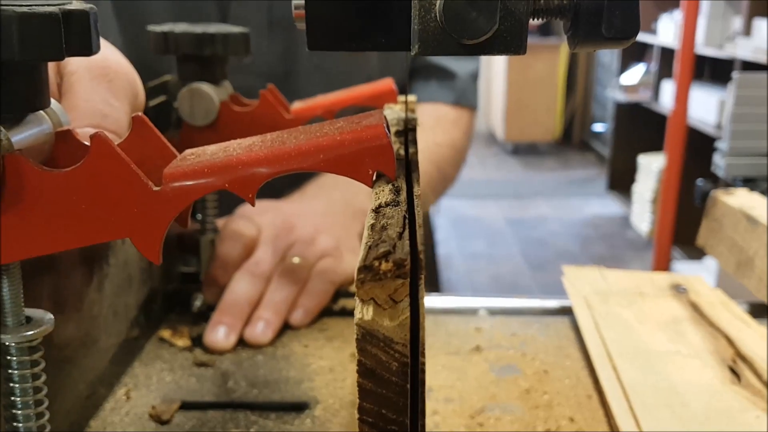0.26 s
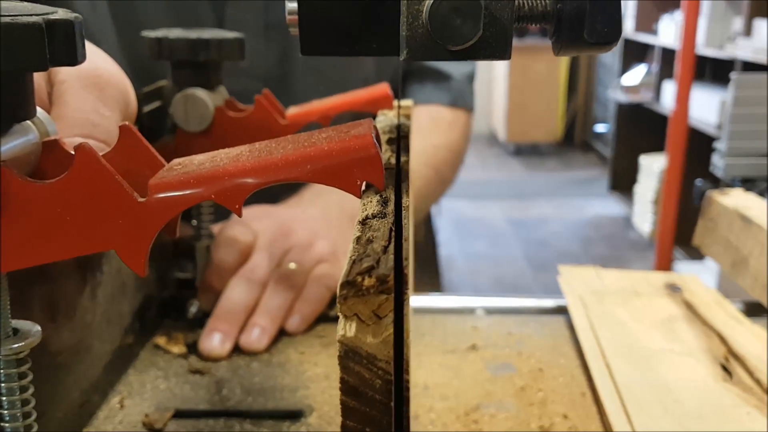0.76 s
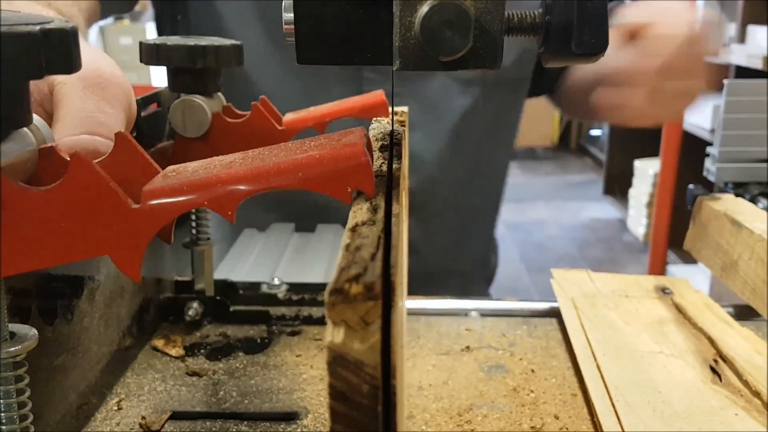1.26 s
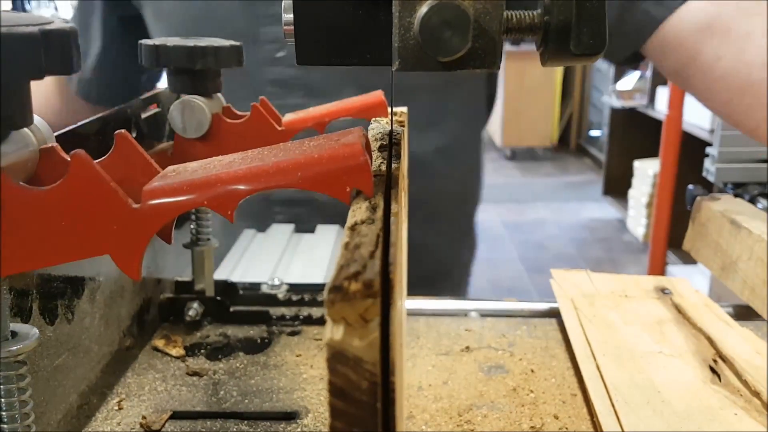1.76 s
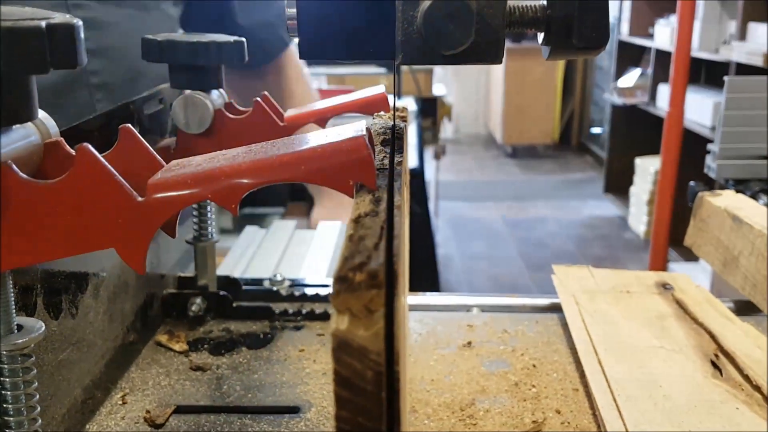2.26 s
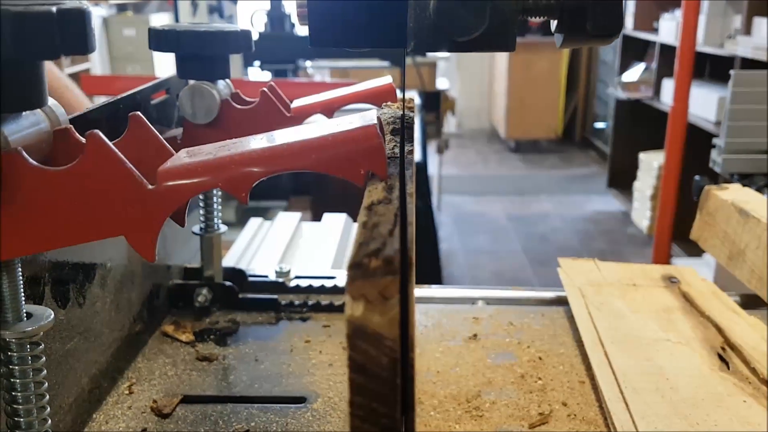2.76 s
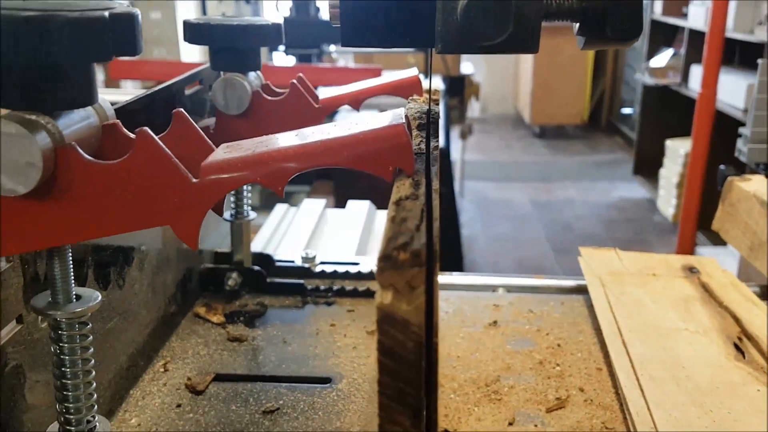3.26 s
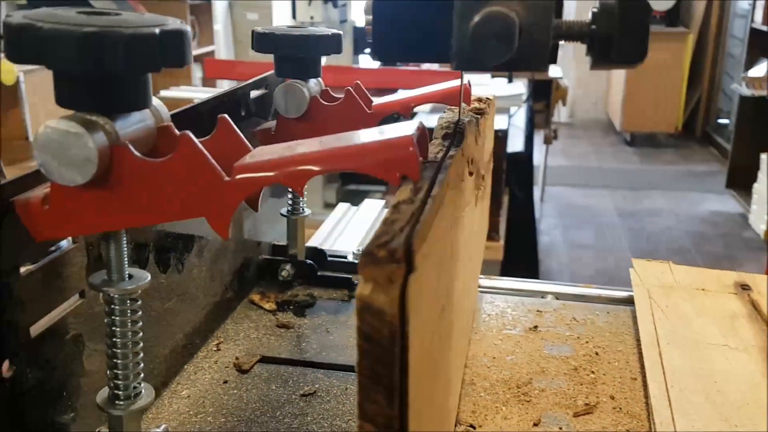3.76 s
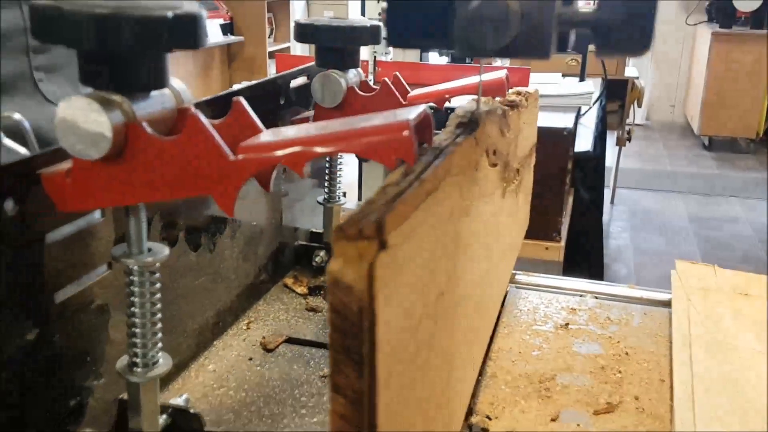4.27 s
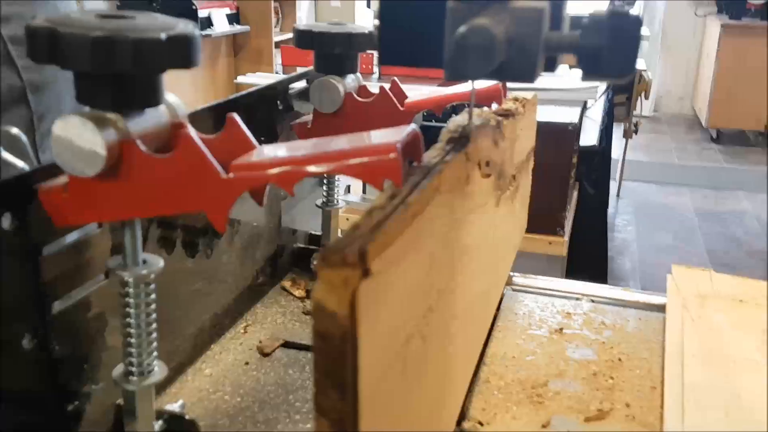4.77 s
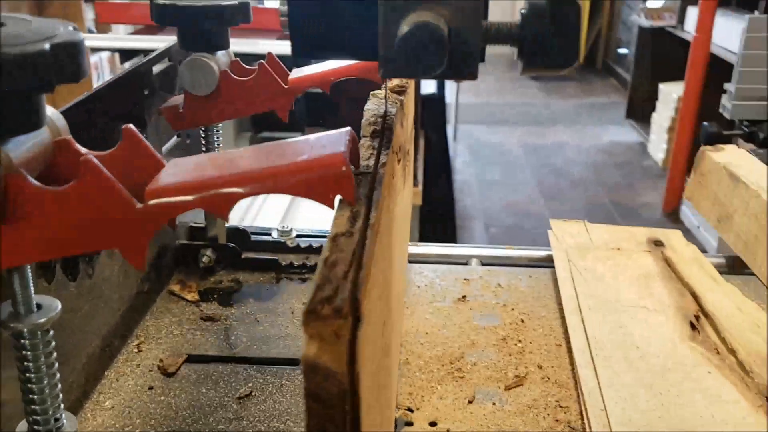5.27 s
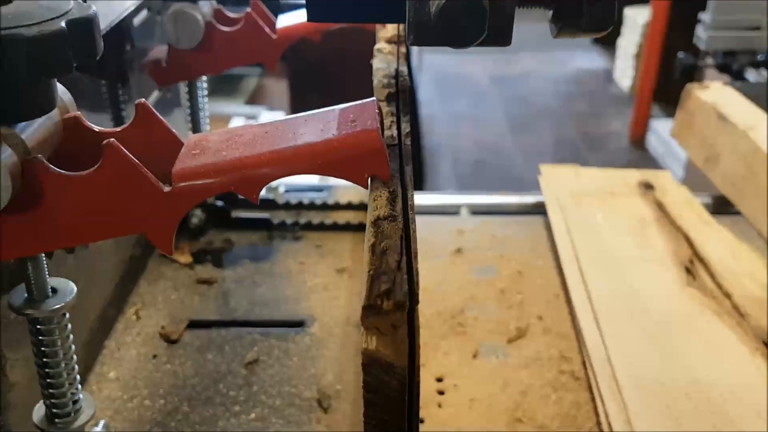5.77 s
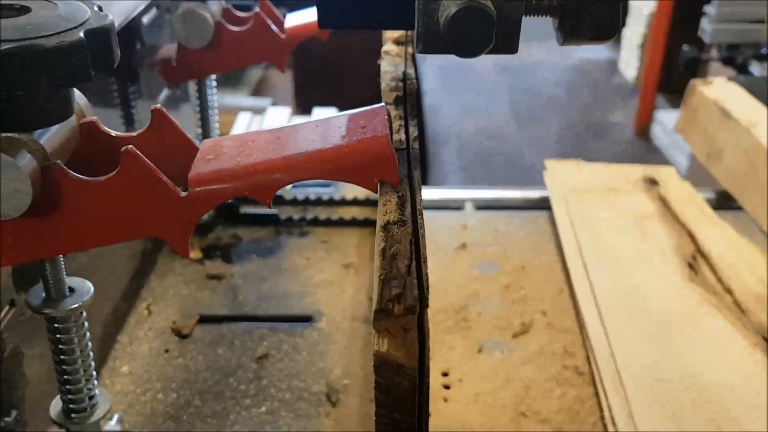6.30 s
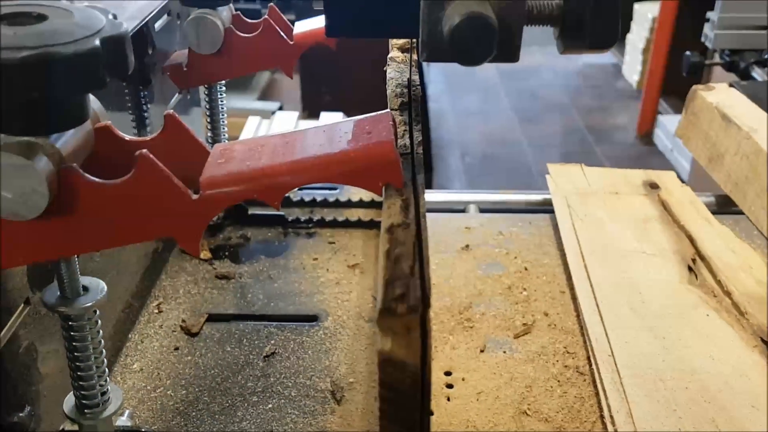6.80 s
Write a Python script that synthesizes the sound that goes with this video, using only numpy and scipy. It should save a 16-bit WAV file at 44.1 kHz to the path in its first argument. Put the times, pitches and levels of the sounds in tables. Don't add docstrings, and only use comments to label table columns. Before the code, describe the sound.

Stuttering wood squeal and chip hiss stop as a bandsaw blade comes free, rings harshly, and slows in a long falling metallic whir.

```python
import sys
import numpy as np
from scipy import signal
from scipy.fft import rfft, irfft, next_fast_len
from scipy.io import wavfile
from scipy.ndimage import uniform_filter1d

SR = 44100
rng = np.random.default_rng(int(sys.argv[2]) if len(sys.argv) > 2 else 0)


def transcribe(u):
    v = np.clip(np.atleast_2d(u).T, -1, 1)
    q = np.round(v * 32767).astype(np.int16)
    wavfile.write(sys.argv[1], SR, q)


def how_loud(loudness_db):
    steps = np.asarray(loudness_db, float) / 20
    return 10 ** steps


N = 310444

TEETH_PER_LAP, TEETH_PER_MOTOR_TURN = 166.38, 67.5
LEAVES_WOOD_S, EXTRACTOR_OFF_S = 1.194, 2.59

# time_s, level_db
RUN_LEVEL = [(0, -33.5), (.6, -36), (.95, -31.5), (1.15, -33.5), (1.27, -31), (1.5, -31), (1.9, -33.5),
             (2.8, -34), (3.0, -33.5), (3.15, -33), (3.28, -32.5), (3.4, -34), (3.68, -34), (3.78, -34.5),
             (4.7, -35.5), (5.05, -37), (5.9, -36.5), (7.04, -39.5)]
# pitch_hz, width_hz, level_db
FRAME_MODES = [(1123.6, 22, -5), (1393, 29, 2), (1743, 295, -8.5), (2320, 58, 2), (2520, 86, -13),
               (2900, 78, 5), (3058, 190, 1), (3900, 76, 1.5), (4387, 240, -0.5), (4584, 36, 6),
               (4850, 330, -7), (5654, 36, 3), (5990, 720, -10)]
# pitch_hz, width_hz, level_db
GUIDE_MODES = [(6960, 210, -16), (8900, 160, 18.5), (8800, 630, -7)]
# pitch_hz, level_db (per Hz)
BETWEEN_MODES = [(350, -36.5), (600, -20), (1100, -12.5), (2100, -10), (2900, -5), (3550, -5.5),
                 (4400, -4.5), (5300, -5.5), (6500, -4), (10300, -5), (11500, -0.5), (12200, -7),
                 (13200, 0.5), (14700, -8)]
# start_s, length_s, top_db
GUIDE_BRUSHES = [
    (2.488, 0.055, 4),
    (2.85, 0.092, 3),
    (3.293, 0.4, 3),
    (4.77, 0.034, 1.5),
    (4.967, 0.028, 3.5),
    (6.08, 0.054, 2.5),
    (6.26, 0.033, 1.5),
    (6.495, 0.075, 1.5),
]


def saw(per_s, passed):
    brush_db = sum(db * swell(s, length, edge_s=0.025) for s, length, db in GUIDE_BRUSHES)
    body_share = 0.47
    frame_db = in_time(RUN_LEVEL)[0] + body_share * brush_db
    bright_db = -8 + 1.5 * in_wood() - 0.45 * halvings(per_s) + (1 - body_share) * brush_db
    drive = friction(passed) + teeth(per_s)

    wide = how_loud(-0.5) * colour(drive, BETWEEN_MODES)
    dull = signal.sosfiltfilt(signal.butter(2, 7200, fs=SR, output="sos"), wide)
    board_damping = how_loud(-7.0 * in_wood())
    low = board_damping * body(drive, FRAME_MODES, flicker_db=1.0, rate=23.0) + dull

    guides_db = -10.0 - 7.0 * in_wood() - 4.5 * swell(3.72, 7, edge_s=.1)
    high = how_loud(guides_db) * body(drive, GUIDE_MODES, flicker_db=2.7, rate=1.6) + wide - dull
    return how_loud(frame_db) * (rms_one(low) + how_loud(bright_db) * rms_one(high))


def friction(passed):
    lap = (passed / TEETH_PER_LAP + .2335) % 1
    weld = how_loud(8.0 + 1.5 * drift(0.5)) * np.exp(-lap / 0.055)
    throb_db = np.sin(2 * np.pi * passed / TEETH_PER_MOTOR_TURN)
    grit = how_loud(2.31 * rng.exponential(1, N)) * rng.standard_normal(N)
    return rms_one(grit) * np.sqrt(1 + 0.7 * weld) * how_loud(throb_db + 0.47 * drift(31))


# multiple, level_db
FAINT_MULTIPLES = [(4, -24), (5, -25), (8, -22), (10, -25), (14, -25), (15, -19), (16, -21), (28, -20)]


def teeth(per_s):
    order, db = np.transpose(FAINT_MULTIPLES)
    out = 0
    for k in (4, 5, *range(8, 29)):
        line = whine(k * per_s, np.interp(k, order, db), flutter_db=3.0, rate=7.0)
        out += line * (k * per_s < 16500)
    return out


# pitch_hz, width_hz, level_db
SWEPT_MODES = [(785, 44, -3), (1140, 270, -5), (1453, 215, -0.5), (1613, 82, 3), (1920, 310, -1.5),
               (2220, 430, 1), (3100, 690, 10.5), (3360, 140, 7), (4060, 160, -9), (4340, 600, 13.5),
               (4910, 115, 13), (5850, 760, 5), (7400, 2000, -8), (10800, 8500, 1)]
# multiple, level_db
STRONG_MULTIPLES = [(1, -40), (2, -50), (3, -58), (6, -54), (7, -58)]
# start_s, length_s, multiple, level_db
SINGING_MULTIPLES = [(-.05, 0.24, 6, -36.5), (0.51, .33, 6, -44), (.75, .48, 7, -56), (.98, .24, 6, -56),
                     (1.07, 0.11, 1, -47), (1.474, 0.26, 3, -40), (1.5, 0.27, 2, -49),
                     (1.802, 0.36, 7, -54), (2.3, 0.51, 7, -66), (1.8, 0.83, 6, -64), (2.5, .4, 8, -56),
                     (1.803, 0.26, 1, -44), (2.133, 0.25, 1, -43.5), (2.47, 0.4, 3, -49),
                     (2.844, 0.1, 2, -37.5), (3.032, 0.2, 2, -40.5), (2.872, 0.49, 3, -41.5),
                     (4.098, 0.57, 2, -52.5), (3.6, 2, 7, -58), (5.62, 0.17, 7, -53), (5.3, 0.51, 2, -50.5),
                     (5.652, 0.18, 3, -51.5), (6.07, 0.13, 4, -43.5), (6.09, .09, 3, -51),
                     (6.59, 0.11, 7, -47), (6.875, 0.095, 7, -45.5)]


def whistle(per_s):
    per_s = per_s + 2.5 * drift(9.1)
    near_db = 0.51 * (in_time(RUN_LEVEL)[0] + 34)
    slowing_db = 3.5 * halvings(per_s)
    taut_db = 7.5 * swell(-1.06, 2.72, edge_s=0.072)
    flutter_db = 1.4 + .8 * halvings(per_s)
    out = 0
    for multiple, line_db in STRONG_MULTIPLES:
        hz = round(multiple) * per_s
        power = how_loud(2 * -18.5)
        for mode_hz, width, mode_db in SWEPT_MODES:
            power = power + how_loud(2 * mode_db) / (1 + (2 * (hz - mode_hz) / width) ** 2) ** 2
        db = line_db + 10 * np.log10(power) - slowing_db + near_db - 4.3 * in_wood() - taut_db
        out += whine(hz, db, flutter_db, rate=13.0) * (1 + 0.5 * drift(74))
    for s, length, multiple, db in SINGING_MULTIPLES:
        line = whine(round(multiple) * per_s, db, flutter_db=1.0, rate=42.0)
        out += swell(s, length, edge_s=0.029) * line * (1 + 0.57 * drift(84))
    return out


# pitch_hz, width_hz, level_db
BOARD_MODES = [(1539, 36, -11.5), (1600, 30, -3), (1659, 20.5, -2), (1737, 35, -2.5), (1850, 55, -9.5)]
# pitch_hz, width_hz, level_db
SQUEAL_OVERTONES = [(3110, 61, 4.5), (3247, 59, -1), (3377, 26, -2), (4900, 150, 2)]
# pitch_hz, width_hz, level_db
KERF_MODES = [(152, 65, -20), (2420, 630, 2), (3610, 150, 11), (4440, 120, -18), (5630, 310, 13),
              (6670, 120, 1), (7200, 340, 8.5), (8160, 380, 7), (9740, 490, 7), (12140, 350, 7.5),
              (14440, 560, 5.5)]
# time_s, level_db
FEED_PRESSURE = [
    (0, 1),
    (.88, -2),
    (.91, -3.5),
    (.99, -2.5),
    (1.01, -13),
    (1.3, -3),
]


def cut(passed):
    feed_db, = in_time(FEED_PRESSURE)
    ring_db, hiss_db = -32 + feed_db, -34.5 + 0.75 * feed_db
    edges = signal.butter(3, [1480, 1860], "band", fs=SR, output="sos")
    board = body(rng.standard_normal(N), BOARD_MODES, flicker_db=1.5, rate=21.0)
    ring = rms_one(signal.sosfilt(edges, board))
    envelope = np.abs(signal.hilbert(ring, next_fast_len(N))[:N])
    even = ring / (envelope + 0.23)
    slip = np.tanh(1.7 * even + .5)
    overtones = how_loud(-10.0) * rms_one(body(slip, SQUEAL_OVERTONES, flicker_db=-2.5, rate=8.2))

    strength = grabs()
    surge = np.sin(2 * np.pi * passed / TEETH_PER_MOTOR_TURN + 0.78 * drift(8.9))
    chips = rng.standard_normal(N) * how_loud(drift(45) + 0.66 * surge) * (1 + 5.1 * strength)
    hiss = rms_one(body(chips, KERF_MODES, flicker_db=0.3, rate=2.4))
    steady = how_loud(ring_db) * (ring + 1.92 * overtones) + how_loud(hiss_db) * hiss
    return strength * (rms_one(even) + overtones) + in_wood() * steady


# start_s, length_ms, squeal_db
WOOD_GRABS = [(0.004, 38, -28), (0.039, 9.2, -32), (0.064, 37, -34.5), (0.144, 18, -25.5), (0.166, 13, -35),
              (0.187, 26, -29), (0.223, 9, -27), (0.243, 47, -24.5), (0.308, 19, -23.5), (0.341, 6.8, -22),
              (0.376, 7.5, -26), (0.391, 41, -29), (0.445, 20, -25), (0.474, 9.9, -28), (0.509, 6.5, -27),
              (0.527, 4.8, -24.5), (0.567, 19, -26), (0.616, 5.9, -23), (0.632, 23, -26.5),
              (0.659, 8.2, -25), (0.673, 17, -25), (0.709, 30, -24.5), (0.779, 11, -26), (0.798, 18, -22),
              (0.837, 19, -21), (0.865, 28, -23), (0.919, 9.1, -37), (0.942, 37, -50), (1.062, 15, -26.5),
              (1.142, 17, -36)]


def grabs():
    stutter_hz, stutter_depth = 70, .4
    on = np.zeros(N)
    for s, ms, db in WOOD_GRABS:
        at = slice(round(s * SR), round((s + ms / 1000) * SR))
        held = np.maximum(since(s)[at] - .004, 0)
        stutter = 1 - np.cos(2 * np.pi * stutter_hz * held)
        on[at] = how_loud(db - 3.5) * (1 - stutter_depth * stutter)
    return uniform_filter1d(uniform_filter1d(on, size=170), size=110)


def in_wood():
    return np.clip((LEAVES_WOOD_S - np.arange(N) / SR) / 0.1 + .5, 0, 1)


# lost_teeth_per_s, time_constant_s
COAST_LOSSES = [(145.2, .2923), (773.8, 3.355)]
# time_s, teeth_per_s
DRIVEN_SPEED = [
    (0, 2002),
    (.3, 2001),
    (.9, 2008),
    (1.05, 2021),
    (1.2, 2026),
    (1.69, 2028),
]


def blade_speed():
    free = since(DRIVEN_SPEED[-1][0])
    lost = sum(loss * (1 - np.exp(-free / tau)) for loss, tau in COAST_LOSSES)
    return in_time(DRIVEN_SPEED)[0] - lost - 96.28 * free - 1.293 * free ** 3


def halvings(per_s):
    return np.log2(DRIVEN_SPEED[-1][1] / per_s)


# pitch_hz, level_db (per Hz)
RUMBLE_SPECTRUM = [(15, -50), (25, -12), (49, -54), (141, -20), (339, -9), (392, -6.5), (484, -2),
                   (598, -16.5), (703, -2), (827, -6.5), (1020, -6), (1110, 3.5), (1200, -6), (1560, -31),
                   (2640, -120)]
# pitch_hz, width_hz, level_db
CABINET_MODES = [(340, 13, -7.5), (397, 17, -5), (467, 4.6, 3), (510.8, 18.7, 8.5), (684, 20, -4.5)]


def rumble(per_s):
    air = rng.standard_normal(N) * how_loud(1.4 * drift(38))
    panels = how_loud(-2.0) * body(air, CABINET_MODES, flicker_db=-0.5, rate=2.8)
    tone = rms_one(colour(air, RUMBLE_SPECTRUM) + panels)
    extractor_db = -51.5 - 17 * since(EXTRACTOR_OFF_S)
    cabinet_db = -52.5 - 4.0 * halvings(per_s)
    shudder = how_loud(2 * -52.5) * np.exp(-((per_s - 1110) / 200) ** 2)
    return np.sqrt(how_loud(2 * extractor_db) + how_loud(2 * cabinet_db) + shudder) * tone


def fan():
    off = since(EXTRACTOR_OFF_S)
    nearing = EXTRACTOR_OFF_S - since(0) + off
    fade_db = 46 * since(EXTRACTOR_OFF_S + 0.16) + 150 * since(3.2)
    return whine(612 * np.exp(-off / 0.72), -55.5 - 2 * nearing - fade_db, flutter_db=3.0, rate=24.0)


def hum(per_s):
    line = whine(8 * per_s / TEETH_PER_MOTOR_TURN, -66.5 - 90 * since(2.35), flutter_db=3.5, rate=11.0)
    return line * (0.62 + 0.33 * swell(.85, 7, edge_s=.2))


# start_s, length_s, first_hz, last_hz, level_db
GLIDING_WHISTLES = [
    (2.31, 0.74, 133.7, 119, -84),
    (3.221, 0.51, 724, 662, -58.5),
    (4.117, 0.48, 709, 656, -56.5),
    (4.757, .36, 644, 495, -70),
]


def glides():
    out = 0
    for s, length, hz, last_hz, db in GLIDING_WHISTLES:
        glide = np.maximum(hz + (last_hz - hz) * since(s) / length, 20)
        out += swell(s, length, edge_s=0.078) * whine(glide, db, flutter_db=5.5, rate=20.0)
    return out


# start_s, peak_db, pitch_hz
HAND_BUMPS = [(0.819, -66, 116), (3.19, -55, 164), (3.487, -57, 199), (3.719, -53, 199), (3.739, -54, 188),
              (3.965, -58, 152), (4.3, -58, 178), (4.469, -60, 91), (4.849, -59, 92), (4.879, -60, 194),
              (4.921, -57, 199), (5.16, -48, 154), (5.19, -62, 128), (5.386, -53, 104), (5.518, -58, 82),
              (5.649, -55, 118), (5.679, -72, 91.5), (5.909, -69, 91.5), (6.844, -61, 105)]


def bumps():
    out, t = np.zeros(N + 2000), np.arange(2000) / SR
    for s, db, hz in HAND_BUMPS:
        turns = t * hz
        at = round(s * SR)
        push = 4 * turns * np.exp(-2.5 * turns) * np.sin(2 * np.pi * turns)
        out[at:at + 2000] += how_loud(db + 8.5) * push
    return out[:N]


def whine(hz, db, flutter_db, rate):
    phase = 2 * np.pi * np.cumsum(hz) / SR + .5 * drift(rate)
    return np.sqrt(2) * how_loud(db + flutter_db * drift(rate)) * np.sin(phase)


def resonate(x, hz, width_hz):
    r = np.exp(-np.pi * width_hz / SR)
    zeros = np.array([1, 0, -1]) * (1 - r * r) / 2
    return signal.lfilter(zeros, [1, -2 * r * np.cos(2 * np.pi * hz / SR), r * r], x)


def body(x, modes, flicker_db, rate):
    out = 0
    for k, (hz, width, db) in enumerate(modes):
        mode = resonate(resonate(x, hz, 1.77 * width), hz, 1.77 * width)
        out += (-1) ** k * how_loud(db + flicker_db * drift(rate)) * mode
    return out


def colour(x, spectrum):
    size = next_fast_len(N)
    hz, db = np.transpose(spectrum)
    grid = np.log(np.arange(size // 2 + 1) * SR / size + 1)
    return irfft(rfft(x, size) * how_loud(np.interp(grid, np.log(hz), db)), size)[:N]


def drift(rate):
    r = np.exp(-40 * np.pi * rate / SR)
    noise = rng.standard_normal(N // 20 + 4002)
    slow = rms_one(signal.lfilter([1], [1, -2 * r, r * r], noise)[4000:])
    return np.interp(np.arange(N) / 20, np.arange(len(slow)), slow)


def swell(s, length, edge_s):
    nearest_end = np.minimum(since(s - edge_s), edge_s + length - since(s))
    return np.clip(nearest_end / edge_s, 0, 1) ** 2


def since(s):
    return np.maximum(np.arange(N) / SR - s, 0)


def in_time(rows):
    s, *columns = np.transpose(rows)
    return [np.interp(np.arange(N) / SR, s, c) for c in columns]


def rms_one(x):
    return x / np.sqrt(np.mean(x ** 2) + 1e-20)


def scene():
    per_s = blade_speed()
    passed = np.cumsum(per_s) / SR
    blade = saw(per_s, passed) + whistle(per_s) + cut(passed)
    background = rumble(per_s) + fan() + hum(per_s) + glides() + bumps()
    mono = blade + background
    return np.array([mono, mono])


def roll_off(x):
    return signal.sosfilt(signal.butter(12, 16330, fs=SR, output="sos"), x)


def record(dry):
    dry = .22 * np.tanh(dry / .22)
    dry = signal.sosfilt(signal.butter(2, 70.0, "high", fs=SR, output="sos"), dry)
    dry = signal.sosfilt(signal.ellip(12, .5, 65, 15770, fs=SR, output="sos"), dry)
    return roll_off(dry)


dry = scene()
out = record(dry)
transcribe(out)
```